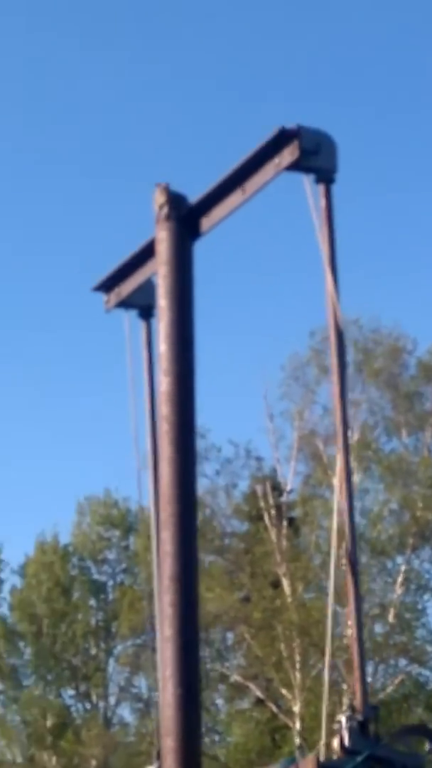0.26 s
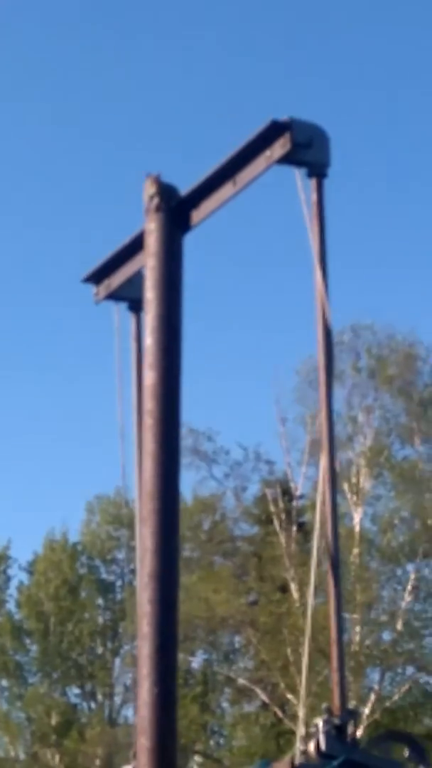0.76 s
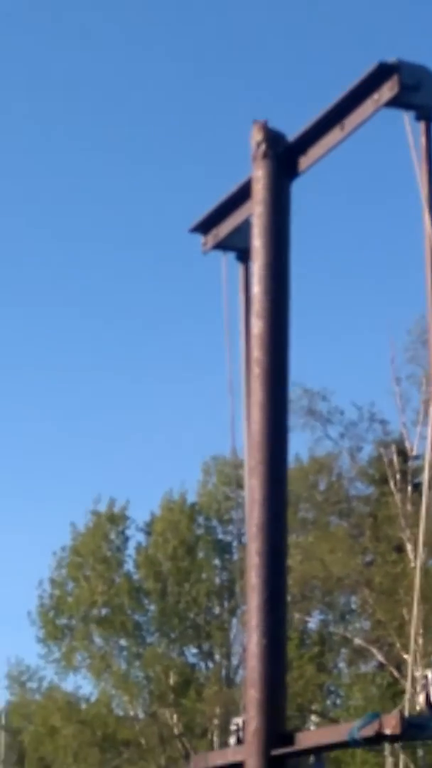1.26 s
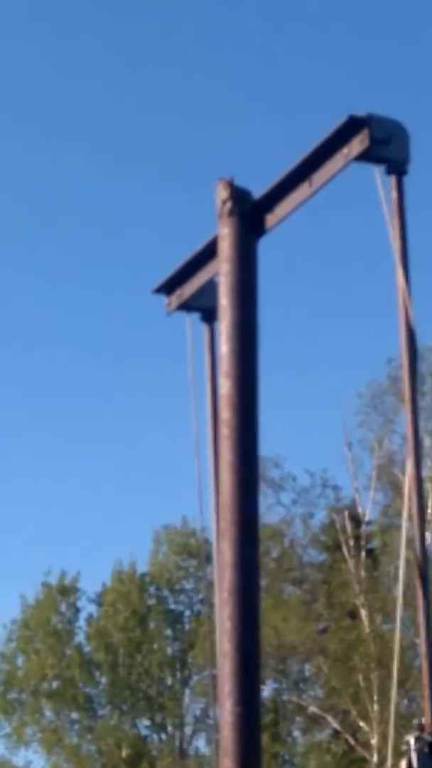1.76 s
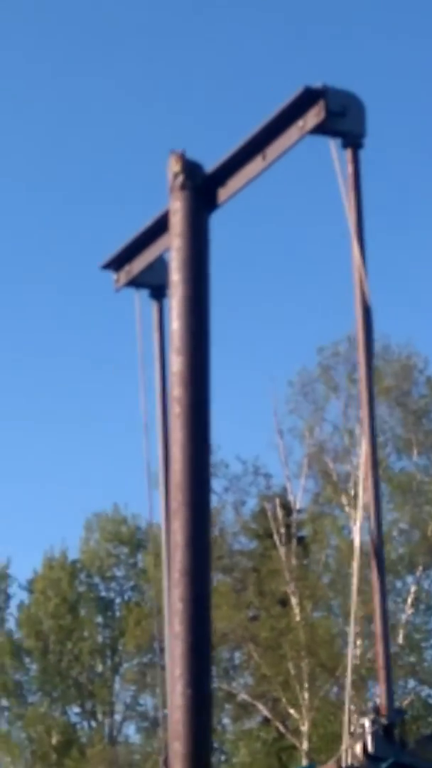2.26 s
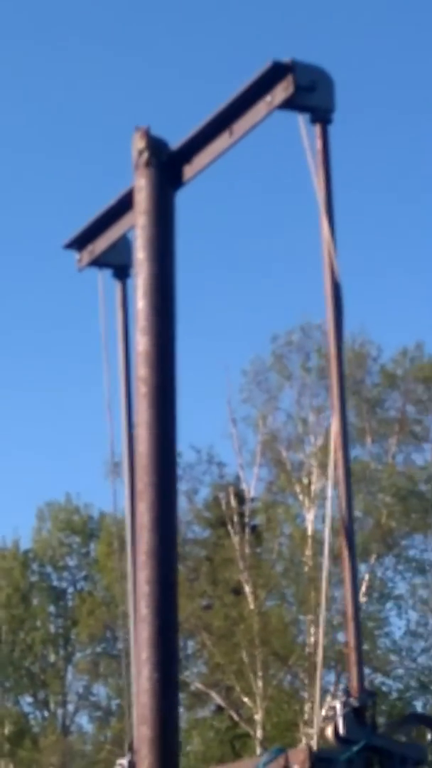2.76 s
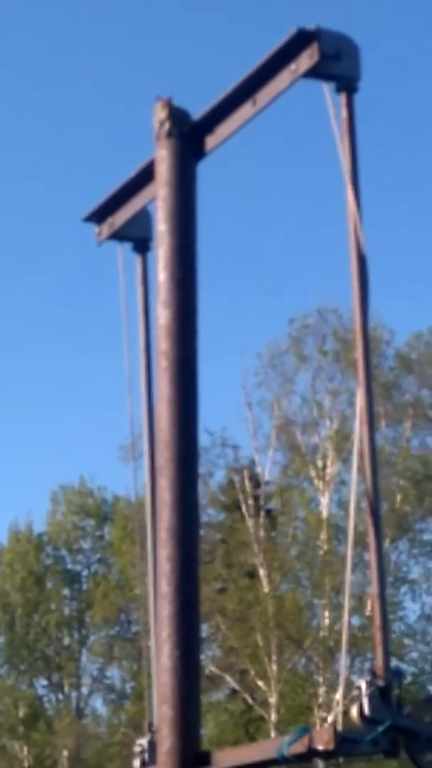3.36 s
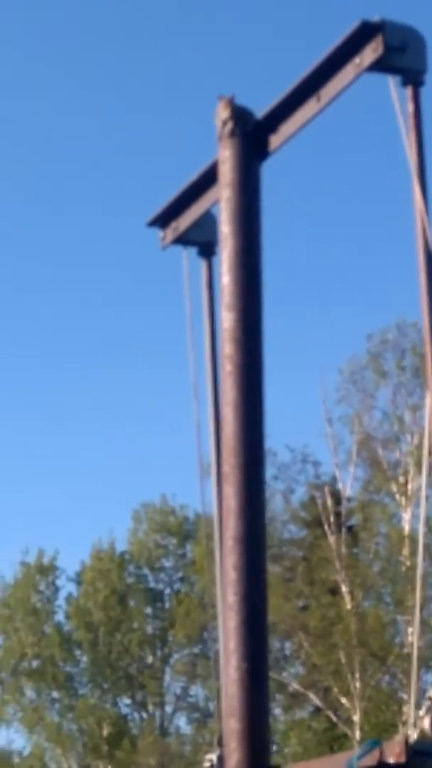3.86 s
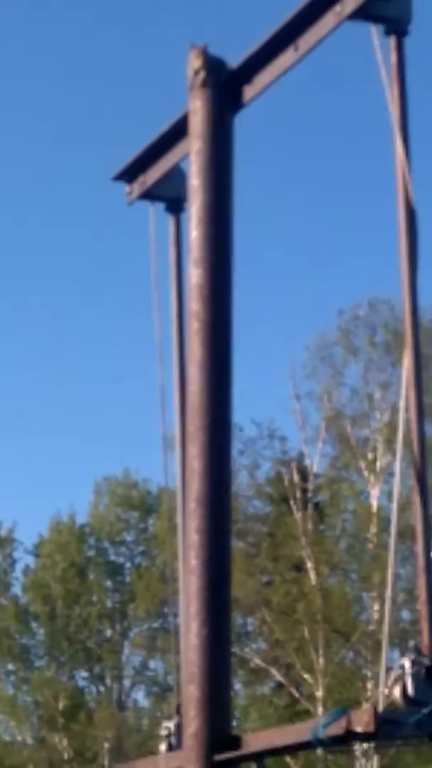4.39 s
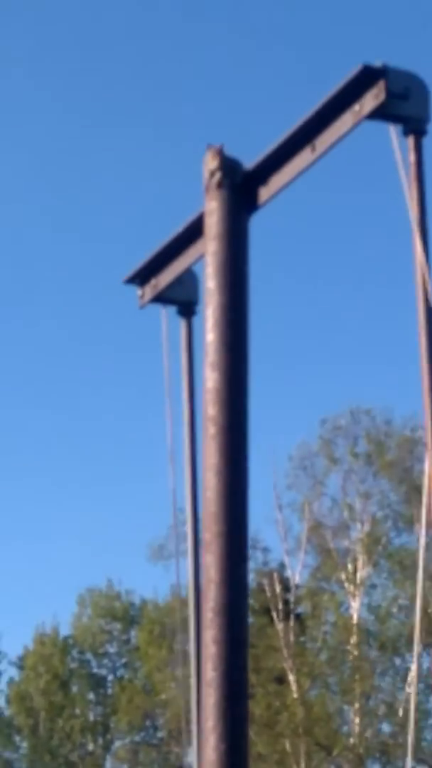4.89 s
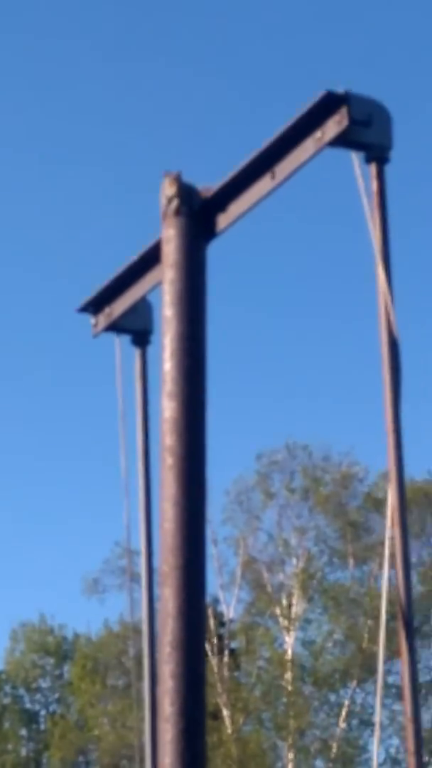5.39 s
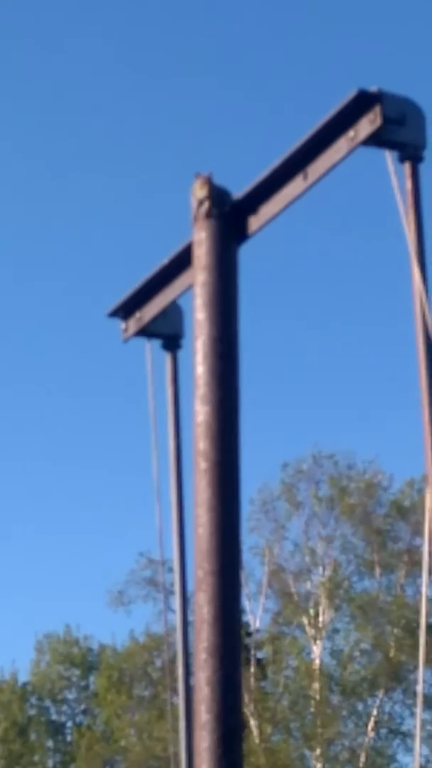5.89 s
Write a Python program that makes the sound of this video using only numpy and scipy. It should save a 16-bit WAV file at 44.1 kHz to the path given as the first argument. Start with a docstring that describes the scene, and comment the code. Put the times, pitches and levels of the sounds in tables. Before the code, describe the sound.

A chipmunk scolds at the edge of a wood, giving short, very high chips about six times a second, some louder than others. Twice in the first half or so, a chip breaks into a brief harsh squeal. Later comes one tiny scratch. The chips are clear, with a slight echo from the trees. Distant crows, thin bird whistles and a soft rush of air stay very faint, dipping between the calls.

```python
"""A chipmunk scolds at the edge of a wood: about six short whistles a second, each rising and falling
in pitch, two of them ending in a harsh squeal. Nearby surfaces smear each chip and the tree line throws
it back. Behind it are far birds, one brief scratch and a soft rush of air and leaves. A noise suppressor
turns this background down, letting it through only while something louder sounds."""
import sys
import numpy as np
from scipy import signal
from scipy.fft import rfft, irfft
from scipy.io import wavfile
from scipy.ndimage import uniform_filter1d

SR = 44100
rng = np.random.default_rng(int(sys.argv[2]) if len(sys.argv) > 2 else 0)


def dump_mix(stems):
    """Bounce the given channels to the path in sys.argv[1] as a 16-bit WAV at rate SR."""
    frames = np.atleast_2d(stems).T  # one column per channel
    limited = np.clip(frames, -1, 1)  # hard clip at full scale
    pcm = np.round(limited * 32767).astype(np.int16)
    wavfile.write(sys.argv[1], SR, pcm)


N = 270774
LEAD = SR // 4   # extra samples before time zero, so sounds can already be under way
TIME = np.arange(-LEAD, N) / SR


def from_db(db):
    """Turn decibels into a number to multiply by."""
    return 10 ** (np.asarray(db) / 20)


def unit_rms(x):
    """Scale a sound so its average strength (rms) is 1."""
    return x / np.sqrt(np.mean(x ** 2) + 1e-20)


def panned(db):
    """Left and right gains; positive db makes the left louder."""
    return from_db([[db / 2], [-db / 2]])


def at_hz(points, hz):
    """Read between the rows of a frequency table, on a scale of octaves."""
    f, value = np.transpose(points)
    return np.interp(np.log(hz + 1), np.log(f), value)


def band(x, hz, width_hz):
    """Keep only the frequencies around hz."""
    edges = np.clip([hz - width_hz / 2, hz + width_hz / 2], 10, .47 * SR)
    return signal.sosfilt(signal.butter(2, edges, "band", fs=SR, output="sos"), x + 1e-18)


def resonate(x, modes):
    """Let a sound ring in several bands (resonances), each at its own level."""
    return sum(from_db(db) * unit_rms(band(x, hz, width)) for hz, width, db in modes)


def drift(rate):
    """A random wobble with `rate` new values a second."""
    knots = rng.standard_normal(len(TIME) // 4)
    return np.interp((TIME - TIME[0]) * rate, np.arange(len(knots)), knots)


def during(start, length):
    """The samples of an event and how far through it each one lies (0-1)."""
    at = np.flatnonzero((TIME >= start) & (TIME < start + length))
    return at, (TIME[at] - start) / length


def phase_of(hz):
    """The running angle of a wave that follows a pitch."""
    return 2 * np.pi * np.cumsum(hz) / SR


def arch(u, crest, rise, fall, powers):
    """Depth below the top of an arch: `rise` at u = 0, none at u = crest, `fall` at u = 1."""
    before = np.maximum(1 - u / crest, 0)
    after = np.maximum((u - crest) / (1 - crest), 0)
    return rise * before ** powers[0] + fall * after ** powers[1]


def add(out, first, sound):
    """Mix a stereo sound in from a given sample."""
    out[:, first:first + sound.shape[1]] += sound[:, :len(TIME) - first]


# tone of the outdoor rush: f/Hz, relative level/dB
RUSH_TONE = [(25, -18.5), (55, 0.5), (110, 0), (200, -0.5), (400, -4.5), (800, -6), (1500, -11),
             (3000, -13), (4500, -19.5), (8000, -22), (13000, -18.5)]
# how alike its left and right sides are: f/Hz, likeness (0-1)
RUSH_LIKENESS = [(50, .72), (150, .76), (400, 0.7), (1000, 0.3), (3000, 0)]

def rush(level_db=-57.0, pan_db=-1.5):
    """Steady air and leaf noise, alike on both sides only in the bass."""
    hz = np.arange(len(TIME) // 2 + 1) * SR / len(TIME)
    shared, opposed = rfft(rng.standard_normal((2, len(TIME))))
    alike = at_hz(RUSH_LIKENESS, hz)
    spectrum = np.sqrt(1 + alike) * shared + np.sqrt(1 - alike) * opposed * [[1], [-1]]
    noise = irfft(spectrum * from_db(at_hz(RUSH_TONE, hz)), len(TIME))
    return from_db(level_db) * panned(pan_db) * unit_rms(noise)


# crow-like calls: t/s, length/s, level/dB
BIRD_CAWS = [(-.06, 0.35, -54.5), (1.143, 0.31, -58), (3.52, 0.29, -54), (5.977, 0.35, -56.5)]
# bird whistles: t/s, length/s, first f/Hz, last f/Hz, level/dB
BIRD_WHISTLES = [(2.59, 0.13, 2470, 2390, -63), (3.27, .13, 2374, 2270, -63.5),
                 (3.587, 0.17, 7500, 7020, -63)]

def far_birds(caw_hz=1700, caw_width_hz=550, caw_pan_db=-3):
    """Hoarse caws, blurred by distance into one band of noise, and a few thin whistles."""
    noise = rng.standard_normal((2, len(TIME)))
    hoarse = unit_rms(band(noise, caw_hz, caw_width_hz)) * panned(caw_pan_db)
    out, waver = np.zeros((2, len(TIME))), drift(250)
    for start, length, level_db in BIRD_CAWS:
        at, u = during(start, length)
        out[:, at] += from_db(level_db) * np.sqrt(np.sin(np.pi * u)) * hoarse[:, at]
    for start, length, first_hz, last_hz, level_db in BIRD_WHISTLES:
        at, u = during(start, length)
        pitch = (first_hz + (last_hz - first_hz) * u) * (1 + .009 * waver[at])
        out[:, at] += from_db(level_db) * np.sin(np.pi * u) * np.sin(phase_of(pitch))
    return out


# echoes from the tree line: delay/s, relative level/dB
TREE_ECHOES = [(.083, -29.5), (0.119, -23.5)]
# how the trip to the trees and back changes the tone: f/Hz, gain/dB
ECHO_TONE = [(1000, -4.5), (3500, -4), (5300, -10.5), (6600, 2), (9000, -7), (13000, -12)]

def clearing(call, near_db=3.84, far_db=-20, build_s=.0023, right_lag_s=.0001):
    """Add reflections to a call. The hand-held microphone moves, so each call gets new ones."""
    t = np.arange(SR // 2) / SR

    def scatter(delay, fade_s):
        """Reflections that build up after a delay and die away by 60 dB in fade_s."""
        age = np.maximum(t - delay, 0)
        shape = np.minimum(age / build_s, 1) * from_db(-60 * age / fade_s)
        bounces = rng.standard_normal((2, len(t))) * shape
        return bounces / np.linalg.norm(bounces, axis=1, keepdims=True)

    trees = sum(from_db(db) * scatter(delay, fade_s=.015) for delay, db in TREE_ECHOES)
    tone = from_db(at_hz(ECHO_TONE, np.fft.rfftfreq(len(t), 1 / SR)))
    response = from_db(near_db) * scatter(.0025, fade_s=.093) + from_db(far_db) * scatter(0, fade_s=.61)
    response += irfft(rfft(trees) * tone, len(t))
    response[[0, 1], [0, round(right_lag_s * SR)]] += 1   # the direct sound reaches the left first
    heard = signal.fftconvolve(call[None], response, axes=1)
    return heard * np.linalg.norm(call) / np.linalg.norm(heard, axis=1, keepdims=True)   # same energy


# a short rustle: t/s, length/s, level/dB
SCRAPES = [(4.672, 0.047, -48)]
# the bands it rings in: f/Hz, width/Hz, relative level/dB
SCRAPE_BANDS = [(675, 700, 3), (1660, 1100, 3), (3100, 580, 5)]

def scratch(grain_db=3.0):
    """A grainy scrape, perhaps claws on bark."""
    grains = rng.standard_normal(len(TIME)) * from_db(grain_db * drift(700))
    scrape = unit_rms(resonate(grains, SCRAPE_BANDS))
    out = np.zeros((2, len(TIME)))
    for start, length, level_db in SCRAPES:
        at, u = during(start, length)
        add(out, at[0], clearing(from_db(level_db) * np.sin(np.pi * u) * scrape[at]))
    return out


# the chipmunk's pitch shoots up, rounds off and sags; rise and fall are shares of the top pitch
PITCH_ARCH = dict(crest=.47, rise=.24, fall=.25)
# its harsh squeals: t/s, length/s, base level/dB
HARSH_SQUEALS = [(1.336, 0.046, -25.5), (3.197, 0.053, -25)]
# the bands its throat rings in: f/Hz, width/Hz, relative level/dB
THROAT_BANDS = [(1380, 1300, -13.5), (2800, 110, -11), (3260, 160, -5), (3956, 150, -13),
                (5040, 170, -12.5), (5650, 200, -17), (6450, 750, -2), (8350, 1200, -1.5),
                (9950, 1000, -0.5), (11300, 820, -4), (12900, 1500, -3.5)]

def squeals(top_hz=1519.0, jitter=.0717, noise_db=-3, shriek_hz=9900, shriek_db=-1.5,
            fray_s=.016, fray_db=-20.5, pan_db=1.5):
    """A chip frays into hiss, snaps into a brief shriek, then breaks into rough pulses and noise."""
    pitch = np.full(len(TIME), top_hz)
    for start, length, _ in HARSH_SQUEALS:
        at, u = during(start, length)
        pitch[at] *= 1 - arch(u, **PITCH_ARCH, powers=(1.5, 2.0))
    phase = phase_of(pitch * (1 + jitter * drift(1500)))
    pulses = unit_rms(sum(np.cos(k * phase) for k in range(1, 10)))
    noise = from_db(noise_db) * rng.standard_normal(len(TIME))
    voice = unit_rms(resonate(pulses + noise, THROAT_BANDS))
    low = signal.sosfiltfilt(signal.butter(4, 5000, fs=SR, output="sos"), voice)
    shriek = from_db(shriek_db) * np.sin(phase_of(shriek_hz * (1 + .033 * drift(1500))))
    out = np.zeros((2, len(TIME)))
    for start, length, level_db in HARSH_SQUEALS:
        before, _ = during(start - fray_s, fray_s)
        fray = from_db(fray_db) * (voice[before] - low[before])
        at, u = during(start, length)
        force_db = 2.5 - arch(u, crest=.38, rise=4.5, fall=17.5, powers=(1.5, 1.3))
        held_back = 1 - from_db(-20 * np.clip(1 - u / .4, 0, 1))   # the low bands come in last
        call = from_db(force_db) * (voice[at] - held_back * low[at])
        call += shriek[at] * np.exp(-((u - .12) / .13) ** 2)   # a flash near the start
        add(out, before[0], clearing(from_db(level_db) * np.concatenate([fray, call])))
    return out * panned(pan_db)


# the chipmunk's chips: t/s, top f/Hz, base level/dB
SCOLDING_CHIPS = [(-.1, 6450, -18), (0.132, 6654, -20.5), (0.304, 6626, -25.5), (0.51, 5530, -56.5),
                  (0.695, 6530, -27), (0.901, 6704, -26.5), (1.088, 6266, -31.5), (1.297, 6470, -22),
                  (1.607, 6535, -27), (1.76, 6320, -29.5), (1.938, 6680, -25.5), (2.085, 6040, -31.5),
                  (2.233, 6780, -23), (2.408, 6590, -22), (2.578, 6640, -23), (2.736, 6500, -22.5),
                  (2.902, 6304, -31), (3.158, 6310, -29.5), (3.535, 6540, -29), (3.737, 6624, -21.5),
                  (3.939, 6827, -25), (4.108, 6752, -24), (4.27, 6610, -26.5), (4.474, 6555, -23),
                  (4.654, 6454, -23.5), (4.82, 6395, -29.5), (4.965, 6035, -35), (5.114, 6170, -31.5),
                  (5.272, 5570, -40), (5.42, 6870, -25), (5.604, 6574, -25), (5.788, 6570, -24),
                  (5.973, 6476, -25), (6.115, 5940, -34)]
# air hissing with each chip: f/Hz, width/Hz, level/dB compared with the whistle
BREATH_BANDS = [(3010, 560, -41), (5420, 497, -30), (9520, 520, -31.5), (13060, 300, -31.5)]

def chips(usual_s=.0285, usual_hz=6500, usual_db=-25, push_db=6.5, jitter=.0067,
          octave_db=-21.5, octave_roughness=.83, pan_db=2):
    """Air pressure swells and fades, driving an unsteady whistle, a rough tone an octave up and hiss."""
    out, waver = np.zeros((2, len(TIME))), drift(900)
    breath = resonate(rng.standard_normal(len(TIME)), BREATH_BANDS) / np.sqrt(2)
    slip = octave_roughness * drift(1000)   # uneven cycles blur the octave into a narrow band
    for start, top_hz, level_db in SCOLDING_CHIPS:
        effort_db = level_db - usual_db
        # higher chips last longer, harder-pushed ones are over sooner
        length = usual_s * (top_hz / usual_hz) ** 7 * 2 ** (-.0893 * effort_db)
        at, u = during(start, length)
        pitch = top_hz * (1 - arch(u, **PITCH_ARCH, powers=(3.0, 1.5)))
        pressure_db = -arch(u, crest=.45, rise=27, fall=25, powers=(2.2, 2.3))
        phase = phase_of(pitch * (1 + jitter * waver[at]))
        # the octave grows with effort, and swells and fades faster than the whistle
        octave_gain = from_db(octave_db + .17 * effort_db + .29 * pressure_db)
        voice = np.sin(phase) + octave_gain * np.sin(2 * phase + slip[at]) + breath[at]
        add(out, at[0], clearing(voice * from_db(level_db + push_db + pressure_db)))
    return out * panned(pan_db)


def scene():
    """The chipmunk in its clearing, a scratch, far birds and the rush."""
    return (chips() + squeals() + scratch() + far_birds() + rush())[:, LEAD:]


def suppressor(x, shut_db=-59, open_db=-40, depth_db=22.0, window_s=.0033,
               release_db_per_s=440, smooth_s=.015, ahead_s=.0044):
    """Turn everything down unless the treble stands clear of the background."""
    treble = signal.sosfilt(signal.butter(2, 1400, "high", fs=SR, output="sos"), x)
    power = uniform_filter1d(np.mean(treble ** 2, axis=0), int(window_s * SR))
    t = np.arange(N) / SR
    treble_db = np.interp(t + ahead_s, t, 10 * np.log10(np.maximum(power, 1e-14)))
    opened_db = depth_db * np.clip((treble_db - shut_db) / (open_db - shut_db), 0, 1)
    fall_db = release_db_per_s * t   # limits how fast it can close again
    gain = from_db(np.maximum.accumulate(opened_db + fall_db) - fall_db - depth_db)
    lag = np.exp(-1 / (smooth_s * SR))
    return x * signal.lfilter([1 - lag], [1, -lag], gain)


def record(dry, soften_hz=13500, cutoff_hz=14400):
    """Suppress the noise, soften the highest treble, then cut it off steeply."""
    soft = signal.sosfilt(signal.butter(8, soften_hz, fs=SR, output="sos"), suppressor(dry))
    return signal.sosfilt(signal.ellip(10, .2, 70, cutoff_hz, fs=SR, output="sos"), soft)


dry = scene()
out = record(dry)
dump_mix(out)
```